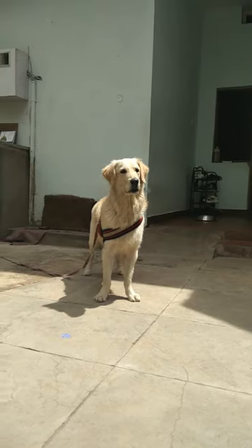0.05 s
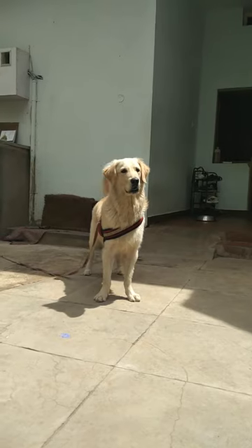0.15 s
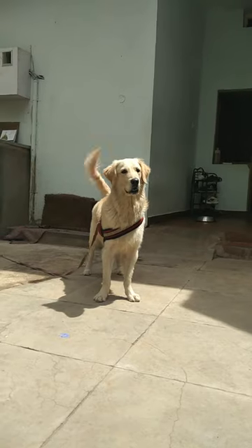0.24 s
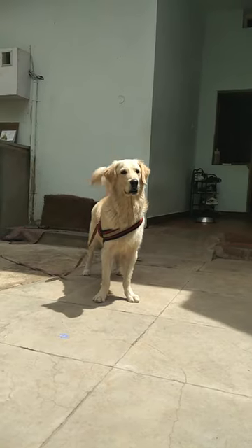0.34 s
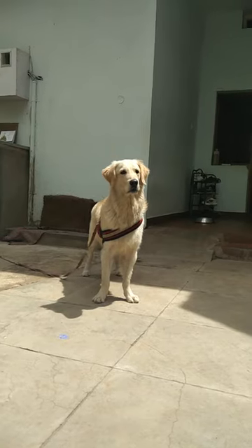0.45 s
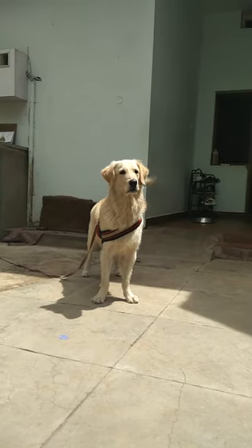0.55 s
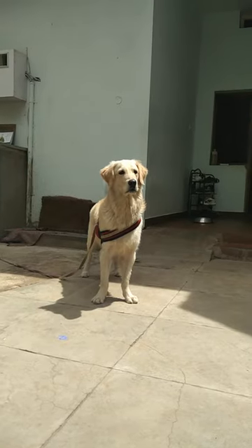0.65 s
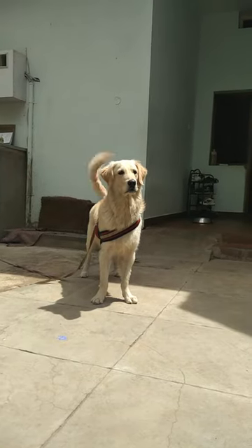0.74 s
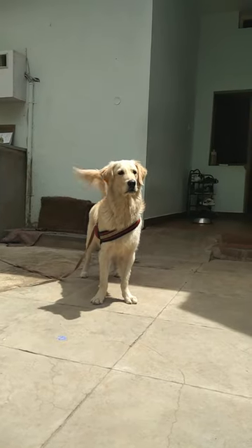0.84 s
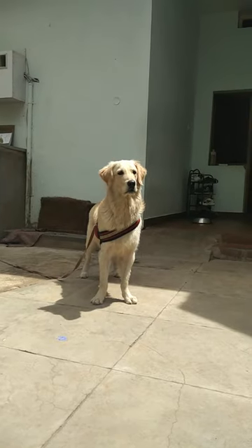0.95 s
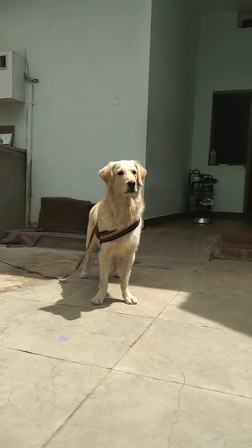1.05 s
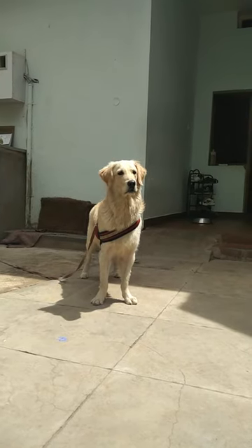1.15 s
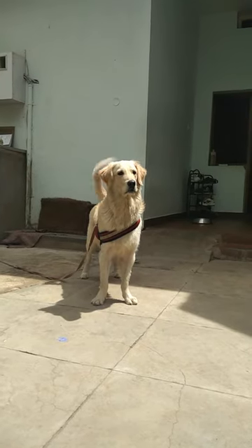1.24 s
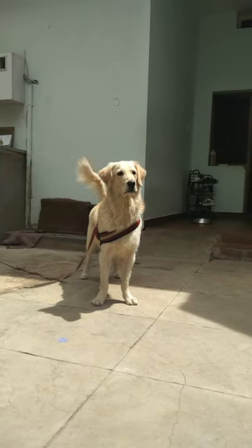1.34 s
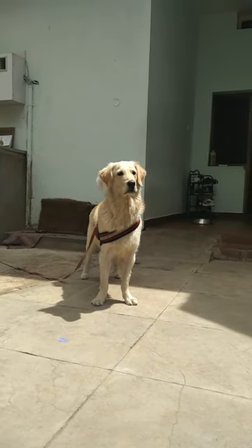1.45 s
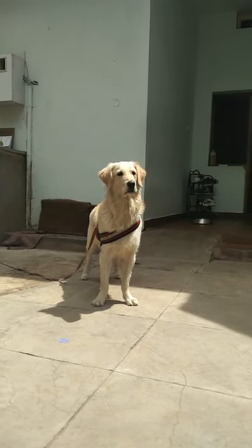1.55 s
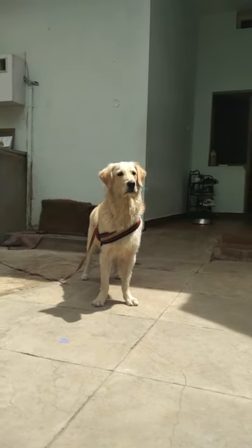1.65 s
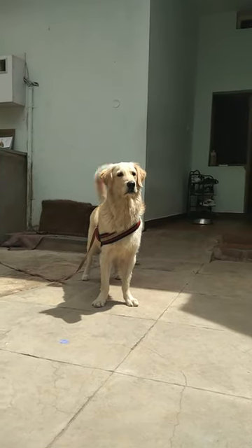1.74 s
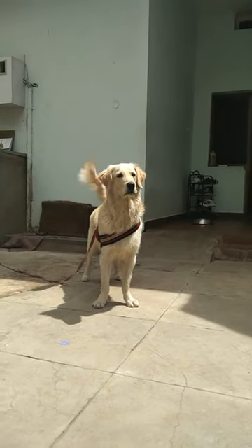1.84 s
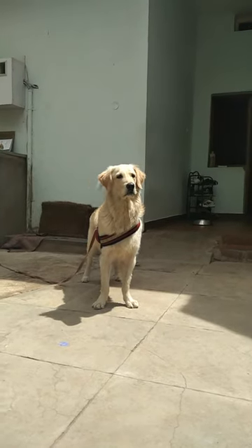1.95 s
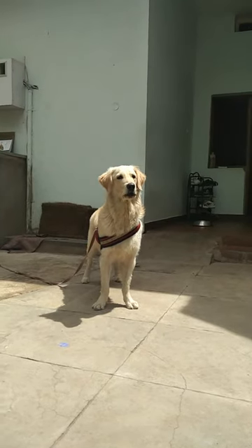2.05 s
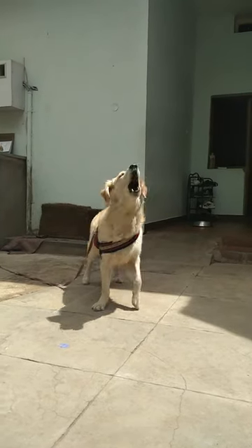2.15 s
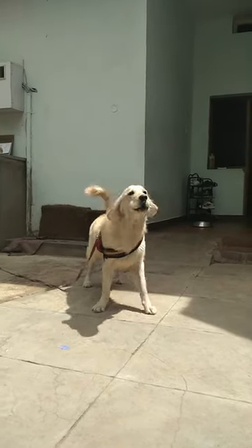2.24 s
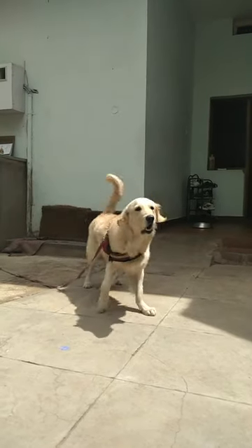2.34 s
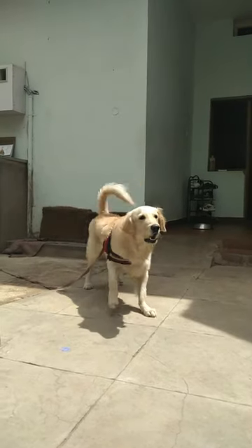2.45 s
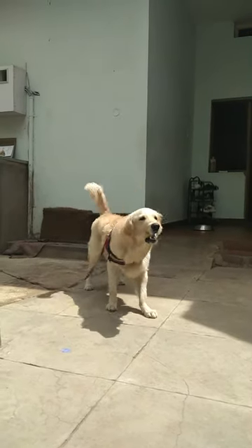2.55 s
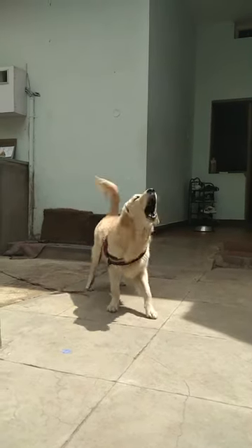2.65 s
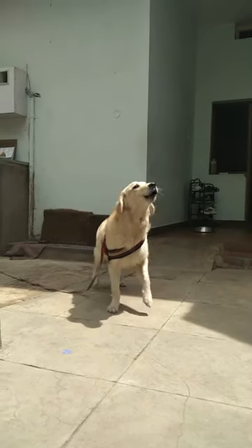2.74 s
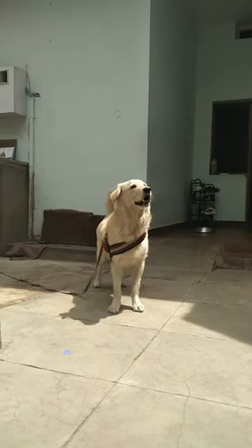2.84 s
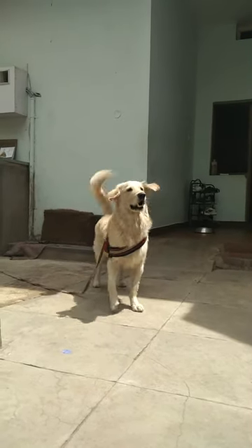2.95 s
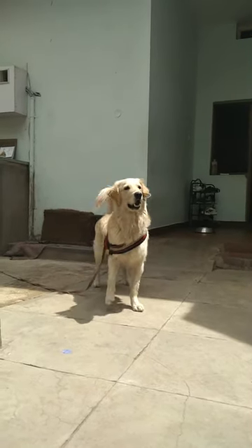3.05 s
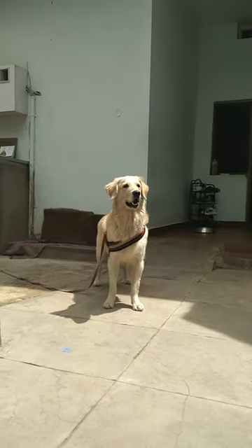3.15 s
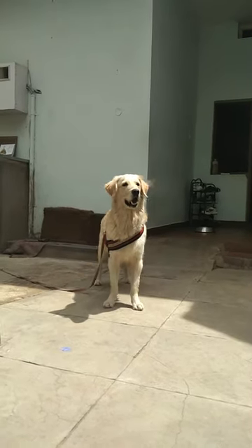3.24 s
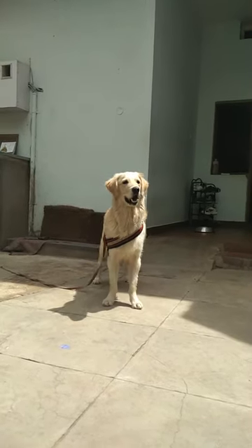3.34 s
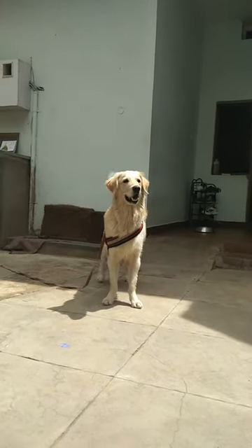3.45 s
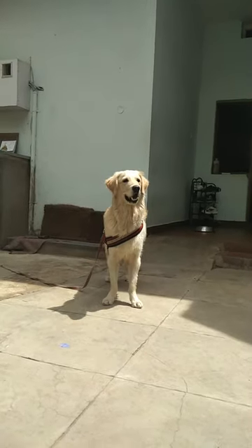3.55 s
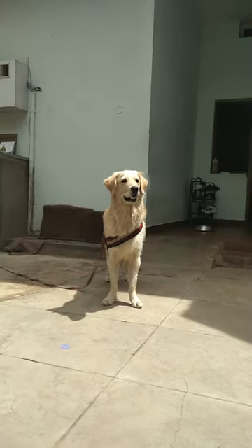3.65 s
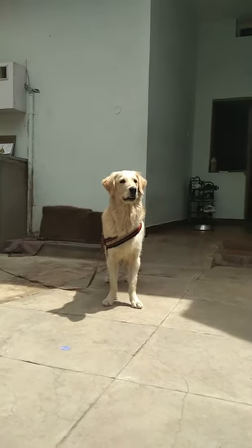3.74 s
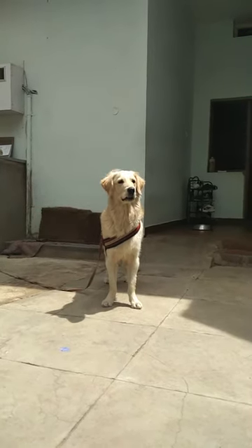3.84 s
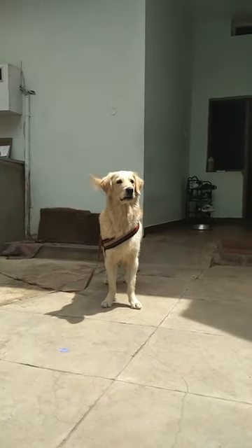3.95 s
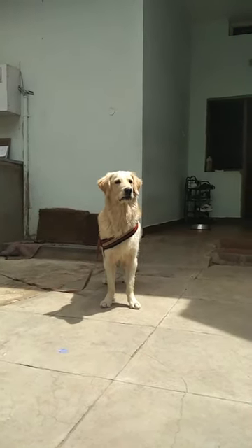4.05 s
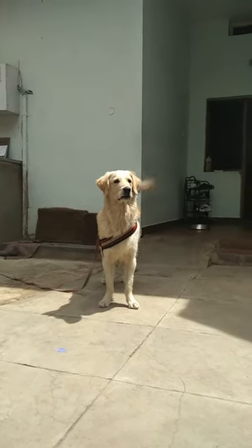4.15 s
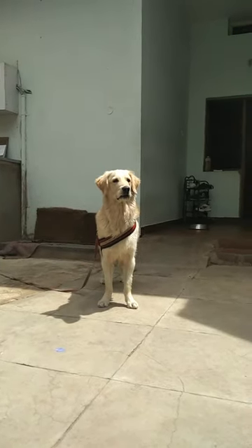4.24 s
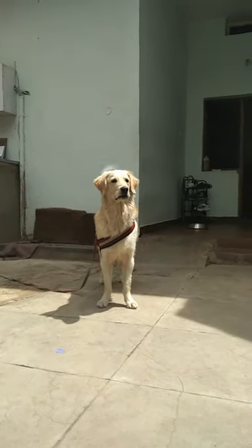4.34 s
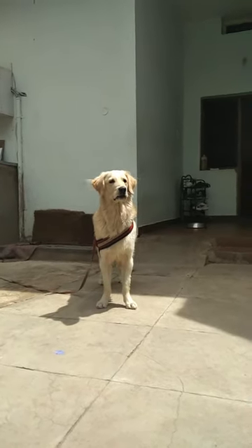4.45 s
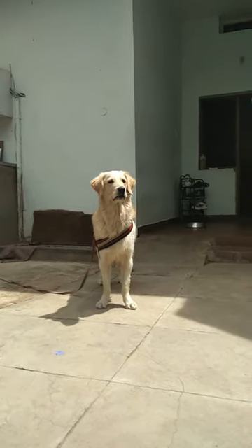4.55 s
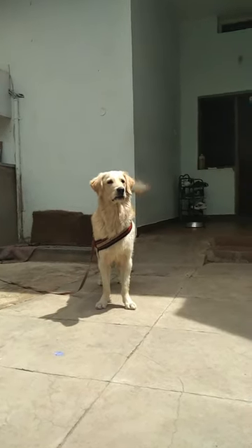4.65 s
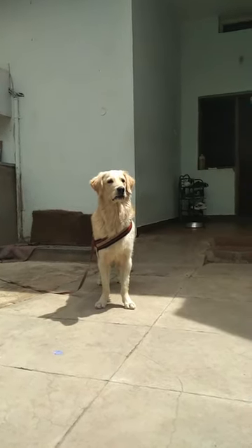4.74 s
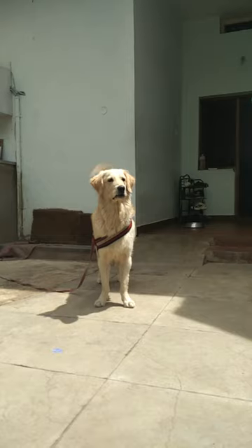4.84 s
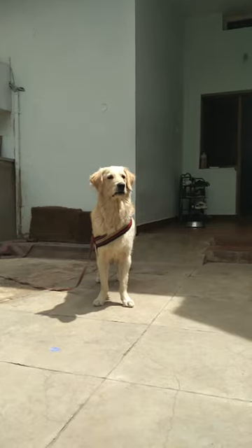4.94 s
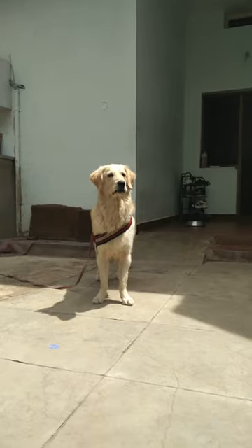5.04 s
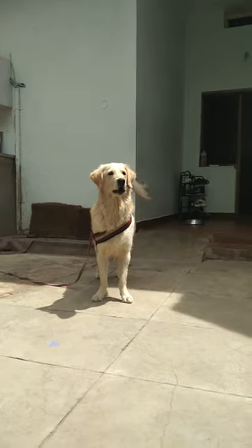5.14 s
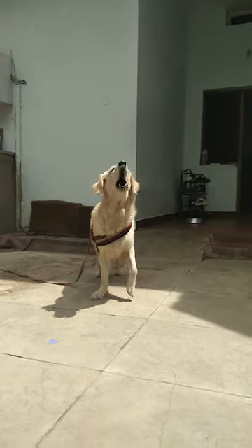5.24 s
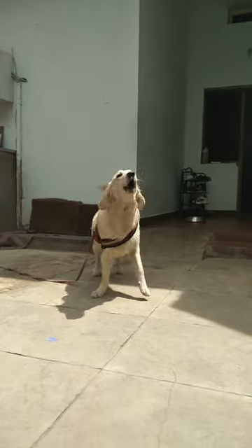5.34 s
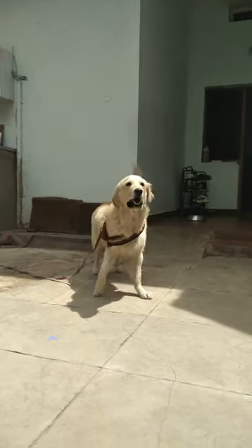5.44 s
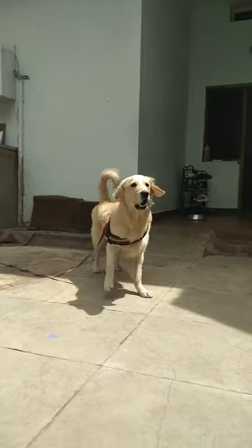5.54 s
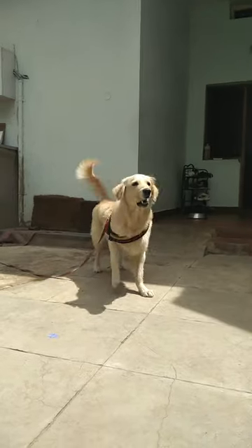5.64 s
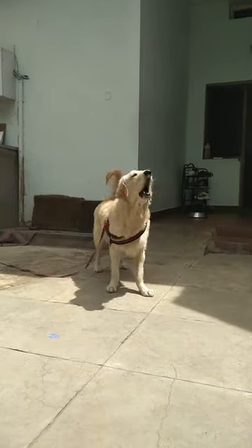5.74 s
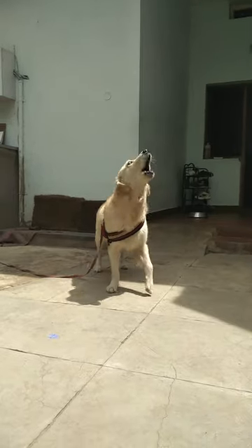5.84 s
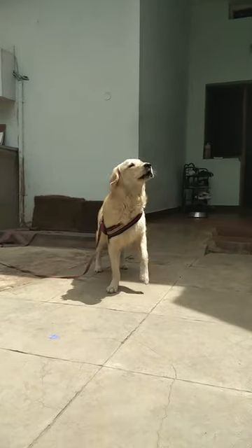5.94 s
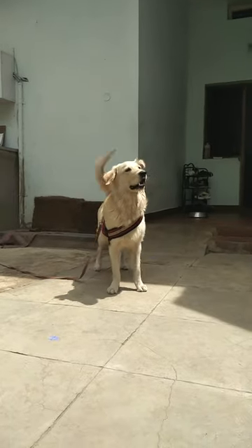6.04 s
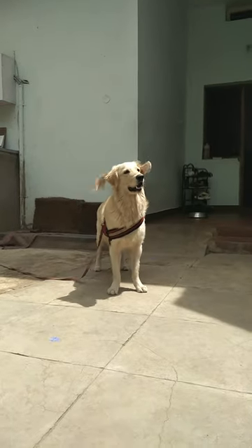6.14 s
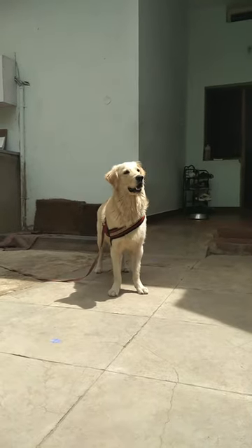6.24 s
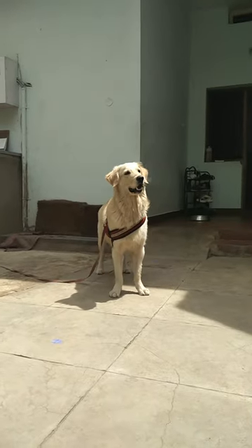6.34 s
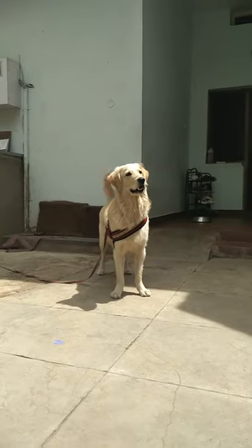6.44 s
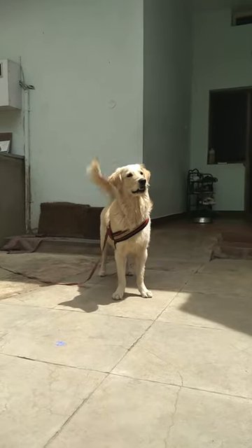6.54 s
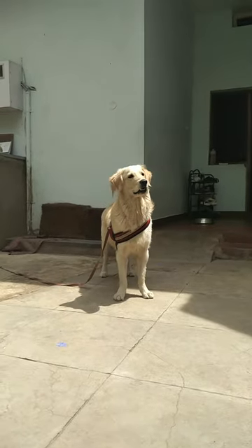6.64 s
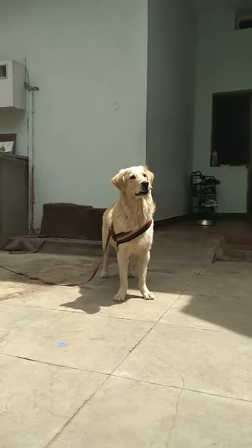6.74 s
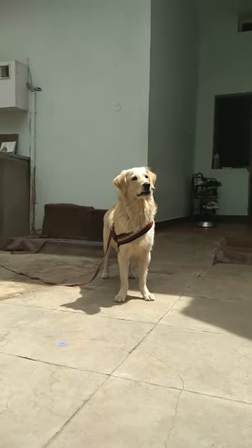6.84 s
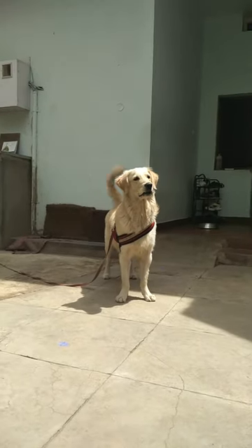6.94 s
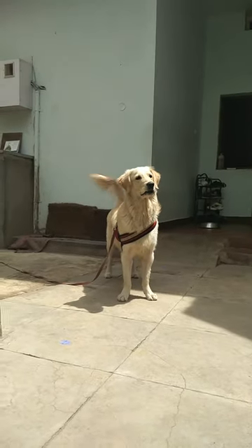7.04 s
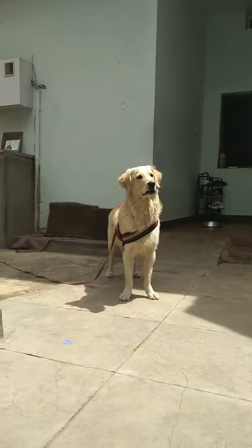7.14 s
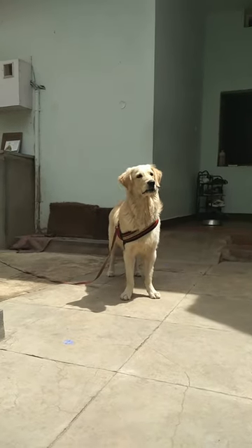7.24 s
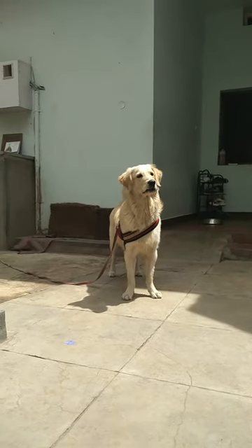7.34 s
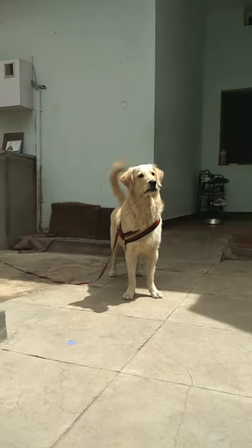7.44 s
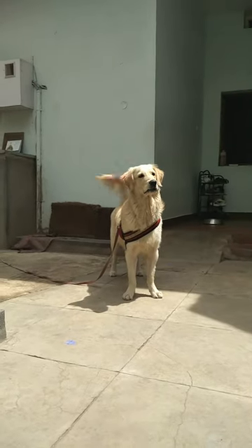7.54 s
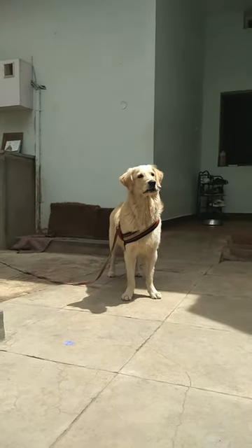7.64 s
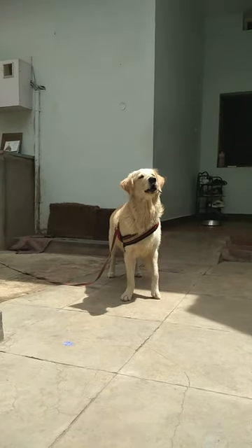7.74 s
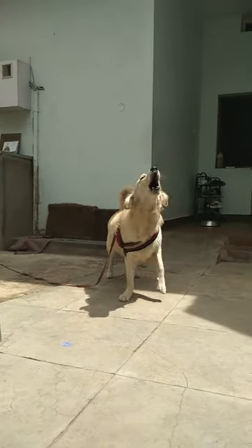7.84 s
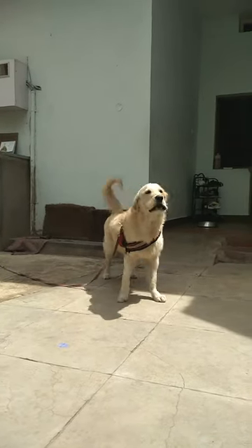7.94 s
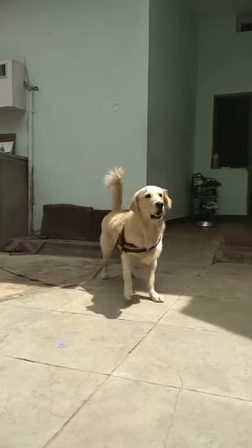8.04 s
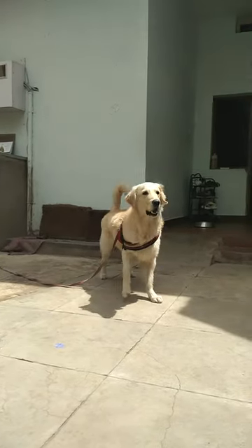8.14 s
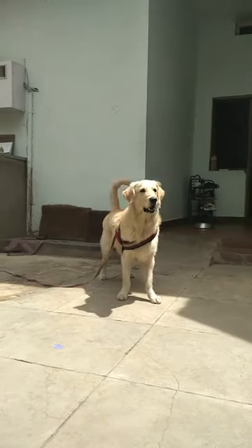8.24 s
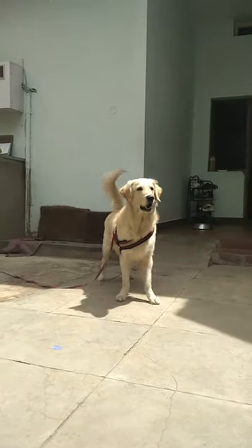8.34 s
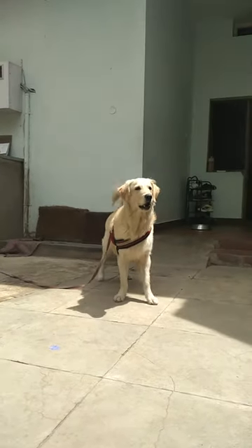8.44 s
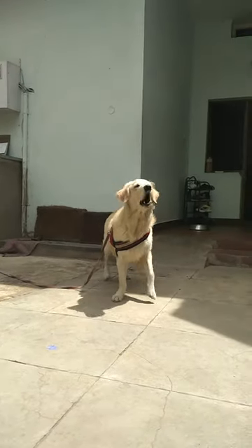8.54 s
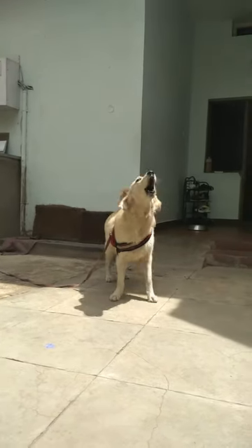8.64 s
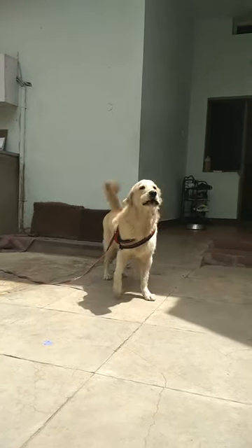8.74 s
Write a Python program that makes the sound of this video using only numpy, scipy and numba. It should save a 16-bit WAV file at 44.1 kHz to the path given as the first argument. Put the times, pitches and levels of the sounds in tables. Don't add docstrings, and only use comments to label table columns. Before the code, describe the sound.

For the first two seconds a walled, paved yard is almost quiet: thin town hum, low wind rumble, far birds whistling short notes, and a faint nose snort at 1.4. A quick gasp leads to a loud, hoarse bark at 2.2 and another at 2.7, with a high nasal whine, a pant and claw scuffs between and after them. Echoes fade quickly off the walls. Around 3.1 to 3.7 a bird sings a chirping phrase twice, with a grunting pant between; a stronger snort comes at 4.0. A sharp gasp at 5.3 precedes barks at 5.35 and 5.85, a softer whine between them, then claws at 6.2. A bird note sounds at 6.5. A breathy squeaking wheeze at 7.4 leads to a bark at 7.9, a strong pant at 8.2, and the last bark near 8.7, cut off at the end.

```python
import sys
import numpy as np
from scipy import signal
from scipy.fft import rfft, irfft, next_fast_len
from scipy.io import wavfile
from scipy.ndimage import uniform_filter1d
from numba import njit

SR = 44100
rng = np.random.default_rng(int(sys.argv[2]) if len(sys.argv) > 2 else 0)


def makeup_ratio(level_db):
    decades = np.asarray(level_db, float) / 20
    return 10 ** decades


def transcribe(signal):
    frames = np.atleast_2d(signal).T
    limited = np.clip(frames, -1, 1)
    pcm = np.round(limited * 32767).astype(np.int16)
    wavfile.write(sys.argv[1], SR, pcm)


N = 387198


def rms_one(x):
    return x / np.sqrt(np.mean(x ** 2) + 1e-20)


def even(x):
    return x / np.sqrt(uniform_filter1d(x ** 2, size=1300) + 1e-12)


def band(x, low_hz, high_hz):
    return signal.sosfilt(signal.butter(3, [low_hz, high_hz], "band", fs=SR, output="sos"), x)


def drift(hz):
    r = np.exp(-2 * np.pi * hz / SR)
    return rms_one(signal.lfilter([1], [1, -2 * r, r * r], rng.standard_normal(N + SR))[SR:])


def in_time(tables):
    t = np.arange(N) / SR
    s, *columns = np.concatenate(tables).T
    edge_s = .004
    gate = 0
    for rows in tables:
        since_start, until_end = t - rows[0][0], rows[-1][0] + edge_s - t
        gate = gate + np.clip(np.minimum(since_start, until_end) / edge_s, 0, 1)
    return [gate] + [np.interp(t, s, c) for c in columns]


def at_hz(points, hz):
    table_hz, value = np.transpose(points)
    return np.interp(np.log(hz + 1), np.log(table_hz), value)


def swell(s, attack_s, hold_s, length_s, start_db, end_db):
    return s + np.array([0, attack_s, hold_s, length_s]), np.array([start_db, 0, 0, end_db])


@njit
def ring(x, cosine, r):
    y = np.zeros(len(x))
    for i in range(2, len(x)):
        y[i] = (1 - r * r) / 2 * (x[i] - x[i - 2]) + 2 * r * cosine[i] * y[i - 1] - r * r * y[i - 2]
    return y


def resonance(x, hz, width_hz):
    return ring(x + 1e-18, np.cos(2 * np.pi * hz / SR) * np.ones(N), np.exp(-np.pi * width_hz / SR))


def tract(x, modes):
    return sum((-1) ** k * makeup_ratio(db) * resonance(x, hz, width) for k, (hz, width, db) in enumerate(modes))


# start_s, length_s, effort_db, top_pitch_hz, climb_s
BARK_EVENTS = [
    (2.22, .165, -3, 471.4, .085),
    (2.713, .168, -4, 480.1, .12),
    (5.346, .145, -2, 425, .075),
    (5.856, .16, -5, 402.3, .075),
    (7.875, .155, -5, 415.9, .045),
    (8.659, .16, -5.5, 418.7, .1),
]
# opening_s, open_mouth_hz, end_mouth_hz, extra_tongue_db
JAW_MOVES = [
    (.042, 700, 800, -6.5),
    (.034, 690, 960, 0),
    (0.048, 740, 520, 0),
    (0.027, 725, 620, 1),
    (0.037, 760, 520, 1.5),
    (0.056, 680, 740, 0.5),
]
# share_of_opening, level_db under full effort
VOICE_ONSET = [(0, -41), (.42, -8.5), (1.001, 0.5)]
# share_of_length, tongue_db, lips_db, rasp_db, lowest_partial_db
JAW_COLOUR = [(0, -6.5, -9, -16, -11.5), (0.299, -13.5, -14.5, -20.5, -13), (.55, -7, -22, -20.5, -12),
              (1, -15, -31.5, -28, -2.5)]


def bark_shapes():
    release_s, release_db = .055, -16
    start_pitch_hz, sag_hz_per_s = 268.94, 250
    jaw_open_share = 0.87
    onset_share, onset_db = np.transpose(VOICE_ONSET)
    colour_share, *colours = np.transpose(JAW_COLOUR)
    tables = []
    for bark, jaw in zip(BARK_EVENTS, JAW_MOVES):
        s, length, db, top_hz, climb_s = bark
        open_s, open_hz, shut_hz, tongue_db = jaw
        t = np.linspace(0, length, 40)
        effort = db + np.interp(t / open_s, onset_share, onset_db)
        effort = effort + np.interp(t, [length - release_s, length], [0, release_db])
        pitch = np.interp(t, [0, climb_s], [start_pitch_hz, top_hz])
        pitch = pitch - sag_hz_per_s * np.maximum(t - climb_s, 0)
        mouth = np.interp(t / length, [jaw_open_share, 1], [open_hz, shut_hz])
        colour = np.transpose([np.interp(t / length, colour_share, c) for c in colours])
        tables.append(np.c_[s + t, effort, pitch, mouth, colour + [tongue_db, 0, 0, 0]])
    return tables


# centre_hz, width_hz, level_db
CHEST_MODE = (498, 52.4, 2.2)
# centre_hz, width_hz, level_db
TONGUE_MODE = (1290, 85, 3)
# centre_hz, width_hz, level_db
LIP_MODES = [(1620, 330, 7.5), (2296, 320, -0.5)]
# centre_hz, width_hz, level_db
RASP_BANDS = [(5100, 260, 5), (5530, 280, -3.5), (6100, 410, 1), (7340, 950, -11.5)]
# centre_hz, width_hz, level_db
SIZZLE_BANDS = [(3300, 1000, -15), (9300, 1600, -10)]


def barks():
    gate, effort_db, pitch_hz, mouth_hz, tongue_db, lips_db, rasp_db, lowest_db = in_time(bark_shapes())
    cycles = np.cumsum(pitch_hz * (1 + .065 * drift(130))) / SR
    strong_weak_db = 5 * np.cos(np.pi * np.floor(cycles)) * (drift(15) > -.6)
    closures = np.diff(np.floor(cycles), prepend=0) > 0
    pulses = closures * makeup_ratio(2.5 * drift(200) + strong_weak_db)
    air = rng.standard_normal(N) * (.4 + np.sin(np.pi * cycles) ** 2)
    source = rms_one(pulses) + .4 * air

    mouth_width_hz = 220
    mouth = resonance(resonance(source, mouth_hz, 3 * mouth_width_hz), mouth_hz, mouth_width_hz)
    low = even(band(tract(source, [CHEST_MODE]) - mouth, 265, 1500))
    lowest = even(resonance(resonance(source, pitch_hz, 170), pitch_hz, 140))
    tongue = even(tract(resonance(source, TONGUE_MODE[0], 420), [TONGUE_MODE]))
    lips = even(band(tract(source + .4 * air, LIP_MODES), 1500, 2600))

    rasp = 0
    for hz, width, db in RASP_BANDS:
        flare = makeup_ratio(db + 4 * drift(30))
        rasp = rasp + flare * resonance(air, hz * (1 + .03 * drift(12)), width)
    rasp = rms_one(band(rasp, 4600, 7000))
    sizzle = 0
    for hz, width, db in SIZZLE_BANDS:
        sizzle = sizzle + makeup_ratio(db) * rms_one(resonance(resonance(air, hz, width), hz, width))
    rasp = rasp + makeup_ratio(0.55 * (effort_db + 7)) * sizzle

    voice = low + makeup_ratio(lowest_db) * lowest + makeup_ratio(tongue_db - 1) * tongue + makeup_ratio(lips_db + 0.5) * lips
    return gate * makeup_ratio(effort_db - 7.0) * (voice + makeup_ratio(rasp_db) * rasp)


def bursts(events, modes, fade_s, gain_db):
    hits = np.zeros(N)
    hits[[round(s * SR) for s, db in events]] = makeup_ratio(np.array(events)[:, 1] + gain_db)
    fade, rise = np.exp(-1 / (fade_s * SR)), np.exp(-1 / (0.0048 * SR))
    dying = signal.lfilter([1], [1, -fade], hits)
    shape = signal.lfilter([1 - rise], [1, -rise], dying)
    return tract(shape * rng.standard_normal(N), modes)


# start_s, peak_db
POP_EVENTS = [
    (2.216, -39.5),
    (2.715, -31),
    (5.267, -56.5),
    (5.346, -31.5),
    (5.857, -29.5),
    (7.874, -28),
    (8.659, -37.5),
]
# centre_hz, width_hz, level_db
POP_MODES = [(300, 83, 3), (970, 320, 1.5), (1386.5, 470, -6), (2200, 890, -10.5)]


def lip_pops():
    pops = bursts(POP_EVENTS, POP_MODES, fade_s=0.024, gain_db=17.5)
    return signal.sosfilt(signal.butter(4, 2600, fs=SR, output="sos"), pops)


# start_s, length_s, hiss_db, throat_db, palate_db
PANT_EVENTS = [
    (2.489, 0.22, -62.5, -58, 3.5),
    (3.314, .22, -67, -58.5, 12),
    (5.621, 0.26, -58.5, -56, 7),
    (6.979, 0.16, -82, -67, 0.5),
    (7.4, 0.43, -72, -63, 11.5),
    (7.785, 0.092, -61, -53.5, 8),
    (8.231, 0.2, -56, -51, 4.5),
]
# start_s, length_s, hiss_db, throat_db, palate_db
GASP_EVENTS = [
    (2.153, .062, -66, -58, 3.5),
    (5.267, 0.06, -50.5, -43.5, 7),
]
# start_s, hiss_db
SIGH_EVENTS = [
    (2.884, -57),
    (6.021, -57),
    (8.029, -54.5),
]


def breath_shapes():
    tables = []
    for rows, attack, hold, end_db in [(PANT_EVENTS, 0.2, 0.59, -12), (GASP_EVENTS, 0.041, 0.65, -13)]:
        for s, length, hiss_db, throat_db, palate_db in rows:
            t, db = swell(s, attack * length, hold * length, length, -9.5, end_db)
            tables.append(np.c_[t, hiss_db + db, throat_db + db, palate_db + 0 * t])
    sigh_s, sigh_throat_db, sigh_fall_db, sigh_palate_db = .16, 15.5, -10.5, 7
    for s, db in SIGH_EVENTS:
        start = (s, db, db + sigh_throat_db, sigh_palate_db)
        end = (s + sigh_s, db + sigh_fall_db, db + sigh_throat_db + sigh_fall_db, sigh_palate_db)
        tables.append(np.array([start, end]))
    return sorted(tables, key=lambda rows: rows[0, 0])


# centre_hz, width_hz, level_db
HISS_MODES = [(4160, 100, 1.5), (5360, 120, -7.5), (5600, 1600, -1.5), (4500, 4100, -5.5)]
# centre_hz, width_hz, level_db
THROAT_MODES = [(236.2, 110, -8.5), (991.7, 91, -6.5), (1196, 33, 1), (1660, 50, -4), (1840, 150, -9.5)]
# centre_hz, width_hz, level_db
PALATE_MODES = [(2300, 450, 1.5), (2900, 930, 0), (3540, 380, 3)]


def breaths():
    gate, hiss_db, throat_db, palate_db = in_time(breath_shapes())
    flap = np.sin(2 * np.pi * np.cumsum(40 * (1 + 0.051 * drift(25))) / SR)
    air = rng.standard_normal(N) * (1 + .4 * flap)
    hiss = resonance(tract(air, HISS_MODES), 5300, 3000) * 5.0
    hiss = hiss + makeup_ratio(palate_db) * tract(air, PALATE_MODES) * 1.1
    throat = tract(air, THROAT_MODES) * 17.0
    return gate * (makeup_ratio(hiss_db + 8.0) * hiss + makeup_ratio(throat_db - 4.5) * throat)


# start_s, length_s, level_db
SNORT_EVENTS = [
    (1.425, 0.26, -65.5),
    (3.996, .31, -57.5),
]
# centre_hz, width_hz, level_db
NOSE_MODES = [(2890, 1000, -1.5), (4200, 660, 4), (5780, 3900, -5.5)]


def snorts():
    tables = []
    for s, length, db in SNORT_EVENTS:
        t, gain_db = swell(s, .035, .07, length, -11, -25)
        tables.append(np.c_[t, db + gain_db])
    gate, level_db = in_time(tables)
    return gate * makeup_ratio(level_db - 1.5) * rms_one(tract(rng.standard_normal(N), NOSE_MODES))


def grunt():
    start_s, length_s, grunt_db, hz, width_hz = 3.345, 0.17, -56.5, 965, 100
    gate, level_db = in_time([np.transpose(swell(start_s, .03, .11, length_s, -16, -20))])
    air = resonance(resonance(rng.standard_normal(N), hz, width_hz), hz, 2 * width_hz)
    return gate * makeup_ratio(grunt_db + level_db + 5.4 * drift(24)) * rms_one(air)


def whistle(tables, wobble, flicker_db):
    gate, hz, level_db = in_time(tables)
    phase = 2 * np.pi * np.cumsum(hz * (1 + wobble * drift(40))) / SR
    return gate * np.sqrt(2) * makeup_ratio(level_db + flicker_db * drift(30)) * np.sin(phase)


def notes(rows):
    share, gain_db = np.array([0, .3, 1]), np.array([-5, 0, -11])
    return [np.c_[s + share * length, hz + share * (to_hz - hz), db + gain_db]
            for s, length, hz, to_hz, db in rows]


# start_s, scoop_from_hz, to_hz, creeping_to_hz, level_db
WHINE_EVENTS = [
    (2.41, 2330, 2372, 2376, -42.5),
    (5.625, 2260, 2335, 2400, -47.5),
]


def whines():
    whine_s, scoop_s, droop_s, droop_hz, edge_db = .3, 0.027, 0.086, 157, -12
    tables = []
    for s, from_hz, hz, held_hz, db in WHINE_EVENTS:
        t, gain_db = swell(s, scoop_s, whine_s - droop_s, whine_s, edge_db, edge_db)
        tables.append(np.c_[t, [from_hz, hz, held_hz, held_hz - droop_hz], db + gain_db])
    return whistle(tables, wobble=0.003, flicker_db=1.5)


# start_s, length_s, from_hz, to_hz, level_db
WHEEZE_EVENTS = [
    (7.42, 0.058, 3046, 3040, -67.5),
    (7.47, .105, 3017, 3090, -56),
    (7.605, .095, 3070, 3058, -53),
    (7.7, .17, 3100, 3045, -66),
]


def wheeze():
    squeak = whistle(notes(WHEEZE_EVENTS), wobble=.003, flicker_db=4.0)
    for ratio in [.857, 1.138]:
        neighbour = [rows * [1, ratio, 1] for rows in notes(WHEEZE_EVENTS)]
        squeak = squeak + makeup_ratio(-12) * whistle(neighbour, wobble=0.0047, flicker_db=4.5)
    return squeak


# start_s, peak_db
CLAW_EVENTS = [(2.5593, -38), (2.6048, -47), (2.6409, -47.5), (2.9562, -31), (2.9766, -45), (2.9984, -38),
               (3.113, -41.5), (3.1567, -42.5), (3.2064, -44), (6.2349, -42), (6.2744, -46.5),
               (6.3291, -46.5), (8.4333, -53)]
# centre_hz, width_hz, level_db
CLAW_MODES = [(3100, 240, -5), (4340, 610, -2), (6000, 400, 0.5), (6100, 460, -1)]


def claws():
    return bursts(CLAW_EVENTS, CLAW_MODES, fade_s=.006, gain_db=9)


# start_s, length_s, from_hz, to_hz, level_db
BIRD_NOTES = [(0, .08, 1740, 1760, -67), (.09, .07, 2180, 2200, -76), (.165, .09, 1750, 1640, -68.5),
              (.49, .1, 1635, 1620, -74), (.6, .14, 1484, 1430, -65), (1.25, .03, 2220, 2340, -61),
              (1.28, .095, 2337, 2380, -51.5), (1.375, .085, 2323, 2054, -49),
              (3.448, 0.026, 2900, 3200, -49), (3.478, .025, 2900, 3300, -54),
              (3.505, .03, 3300, 3920, -57), (6.52, .16, 2120, 2108, -56.5)]
# start_s, dip_pitch_hz, last_pitch_hz, level_db
BIRD_PHRASES = [
    (3.075, 2447, 2600, -50),
    (3.571, 2253, 2164, -51.5),
]
# from_hz, to_hz, level_db
PHRASE_CHIPS = [
    (2900, 3170, 11),
    (2950, 3550, 6.5),
]
# start_s, length_s, from_hz, to_hz, level_db
FAINT_NOTES = [
    (.2, .1, 4150, 4130, -83),
    (.33, .05, 4180, 4200, -85),
    (.48, .12, 2960, 2940, -78),
    (.83, .05, 3850, 3850, -78),
    (1.92, .22, 4170, 4150, -77.5),
]


def birds():
    slide_s, slide_db = np.array([0, .04, .12, .162]), np.array([-2.5, -0.5, -10, 12.5])
    chip_s, chip_length_s = [.17, .214], .017
    tables = notes(BIRD_NOTES)
    for s, dip_hz, last_hz, db in BIRD_PHRASES:
        slide_hz = [1.14 * dip_hz, dip_hz, dip_hz, 2680]
        tables.append(np.c_[s + slide_s, slide_hz, db + slide_db])
        for after, (hz, to_hz, more_db) in zip(chip_s, PHRASE_CHIPS):
            tables += notes([(s + after, chip_length_s, hz, to_hz, db + more_db)])
        drop_s = s + chip_s[-1] + chip_length_s
        tables += notes([(drop_s, .03, PHRASE_CHIPS[-1][1], last_hz, db + 3)])
    tables = sorted(tables, key=lambda rows: rows[0, 0])
    nearer = whistle(tables, wobble=0.012, flicker_db=3.0)
    return (nearer + whistle(notes(FAINT_NOTES), wobble=.006, flicker_db=4.5)) * makeup_ratio(-9.5)


def diffuse(delay, t60_s):
    tail = 0
    for k, lag in enumerate(rng.uniform(0.04, .06, 10)):
        loop = makeup_ratio(-60 * lag / t60_s) * delay(lag)
        tail = tail + (-1) ** k * loop / (1 - loop)
    for lag in rng.uniform(.001, 0.0077, 3):
        tail = tail * (delay(lag) - .6) / (1 - 0.28 * delay(lag))
    return tail


# delay_s, left_db, right_db
NEAR_ECHOES = [
    (.0045, -18.5, -9),
    (.011, -18, -3),
    (.019, -18, -11.5),
    (.028, -13.5, -5.5),
]
# pitch_hz, t60_s
YARD_DECAY = [(200, 1), (340, 0.47), (470, 0.44), (620, 0.19), (1000, 0.39), (1290, 0.32), (1600, 0.057),
              (2800, 0.55), (5000, 0.3), (9000, 0.45)]
# pitch_hz, t60_s
STREET_DECAY = [(300, 0.2), (1200, 0.82), (2800, 0.59), (6000, 0.13)]
# pitch_hz, left_minus_right_db
BODY_SHADOW = [(60, 3), (500, 1.5), (900, 1), (1400, 4), (2400, 8), (4000, 11.5), (7000, 11)]


def courtyard(near, far, wet_db, street_db, far_direct_db):
    size = next_fast_len(N + SR)
    hz = np.arange(size // 2 + 1) * SR / size

    def delay(s):
        return np.exp(-2j * np.pi * hz * s)

    ports = []
    for port, sign in enumerate([1, -1]):
        early = delay(5e-5 * (1 - port))
        for row in NEAR_ECHOES:
            early = early + makeup_ratio(row[1 + port]) * delay(row[0] * (1 + .04 * sign))
        yard = diffuse(delay, at_hz(YARD_DECAY, hz))
        street = diffuse(delay, at_hz(STREET_DECAY, hz))
        heard = rfft(near, size) * (early + makeup_ratio(wet_db) * yard + makeup_ratio(street_db) * street)
        heard = heard + rfft(far, size) * (makeup_ratio(far_direct_db) * early + yard + makeup_ratio(-9.5) * street)
        shadow = makeup_ratio(sign * at_hz(BODY_SHADOW, hz) / 2)
        ports.append(irfft(shadow * heard, size)[:N])
    return np.array(ports)


# pitch_hz, likeness_0_to_1
PORT_LIKENESS = [(30, .35), (60, 0.97), (130, 1), (400, 0.31), (1500, 0.12), (6000, .1)]


def far_noise(spectrum):
    hz = np.arange(N // 2 + 1) * SR / N
    mid, side = rfft(rng.standard_normal((2, N)))
    alike = np.clip(at_hz(PORT_LIKENESS, hz), 0, 1)
    pair = np.sqrt(1 + alike) * mid + np.sqrt(1 - alike) * side * np.array([[1], [-1]])
    return rms_one(irfft(pair * makeup_ratio(at_hz(spectrum, hz)), N))


# time_s, level_db
WIND_GUSTS = [(0, -69.5), (1.4, -70.5), (1.8, -71.5), (3.8, -72.5), (4.2, -68), (4.6, -77), (4.9, -64.5),
              (5.15, -72.5), (5.28, -55.5), (5.36, -69), (6.7, -66), (7.4, -59.5), (7.78, -56),
              (8.05, -67.5), (8.3, -58.5), (8.5, -66.5), (8.78, -62)]
# pitch_hz, level_db per Hz
WIND_SPECTRUM = [(12, -57.5), (20, -23.5), (41, -13), (65, -4.5), (151, -5.5), (206, -7), (264, -9),
                 (308, -15.5), (450, -39.5), (580, -67.5), (990, -120)]


def wind():
    stir_db, stir_rise_s, stir_fall_s = 14.5, .06, 0.49
    since = np.maximum(np.arange(N) / SR - np.array(BARK_EVENTS)[:, :1], 0)
    stir = np.sum((1 - np.exp(-since / stir_rise_s)) * np.exp(-since / stir_fall_s), axis=0)
    level_db = in_time([WIND_GUSTS])[1] + stir_db * stir
    return makeup_ratio(level_db + 3 + 2.5 * drift(6)) * far_noise(WIND_SPECTRUM)


# time_s, level_db
TOWN_LEVEL = [(0, -77.5), (1.9, -81), (3.7, -75), (5.0, -77.5), (6.7, -71), (7.4, -69), (8.78, -68)]
# pitch_hz, level_db per Hz
TOWN_SPECTRUM = [(210, -30), (350, -8), (518, -5.5), (737, -12), (1050, -2.5), (1210, -9.5), (1590, -4.5),
                 (1740, -9.5), (2160, -8.5), (2540, -10.5), (3710, -10.5), (4160, -13.5), (7160, -17),
                 (9310, -39.5), (15800, -120)]
# centre_hz, width_hz, level_db
MACHINE_TONES = [(1040, 40, -87), (1560, 50, -90), (3860, 30, -91)]


def town():
    hum = makeup_ratio(in_time([TOWN_LEVEL])[1] + 3 + 1.2 * drift(8)) * far_noise(TOWN_SPECTRUM)
    for hz, width, db in MACHINE_TONES:
        hum = hum + makeup_ratio(db + drift(5.5)) * rms_one(resonance(rng.standard_normal(N), hz, width))
    return hum


def scene():
    dog = barks() + lip_pops() + breaths() + snorts() + grunt() + whines() + wheeze() + claws()
    yard = courtyard(dog, birds(), wet_db=-15.5, street_db=-25.5, far_direct_db=4.5)
    return yard + wind() + town()


def band_limit(x):
    return signal.sosfilt(signal.butter(12, 20000, fs=SR, output="sos"), x)


# pitch_hz, level_db
TREBLE_FALL = [(6900, 0), (7500, -10.5), (8300, -20.5), (9000, -18.5), (9800, -23.5), (10500, -36.5),
               (20000, -62.5)]


def record(dry):
    size = next_fast_len(N + SR // 10)
    response = makeup_ratio(at_hz(TREBLE_FALL, np.arange(size // 2 + 1) * SR / size))
    heard = irfft(rfft(dry, size) * response, size)[:, :N]
    knee = .85
    bent = np.sign(heard) * (knee + (1 - knee) * np.tanh((np.abs(heard) - knee) / (1 - knee)))
    mix = np.where(np.abs(heard) > knee, bent, heard)
    return band_limit(mix)


dry = scene()
out = record(dry)
transcribe(out)
```